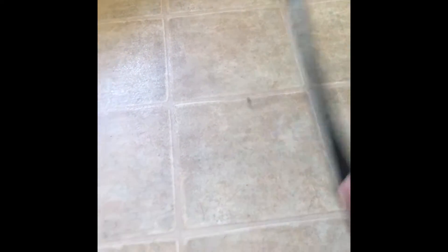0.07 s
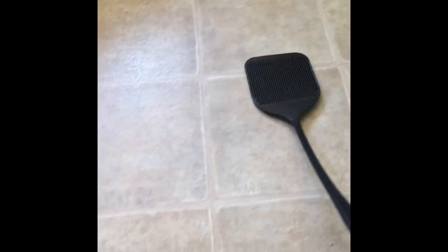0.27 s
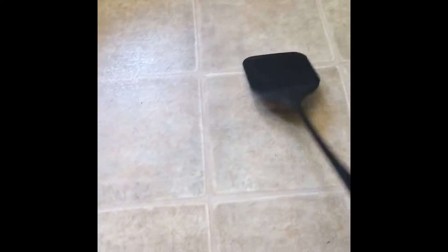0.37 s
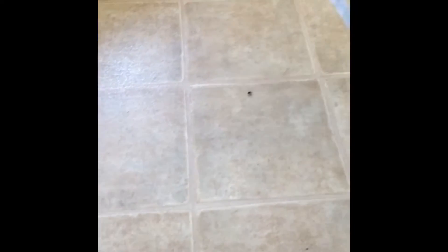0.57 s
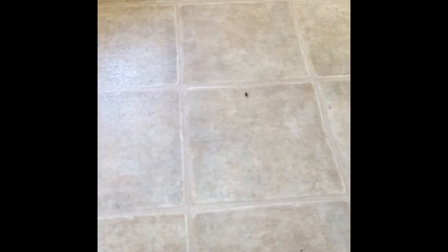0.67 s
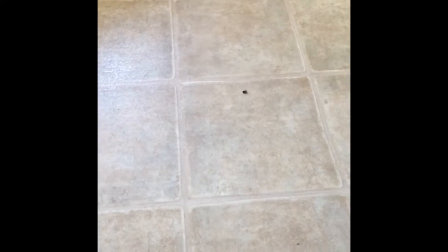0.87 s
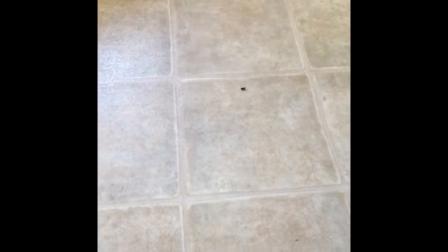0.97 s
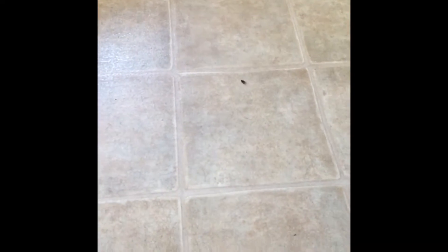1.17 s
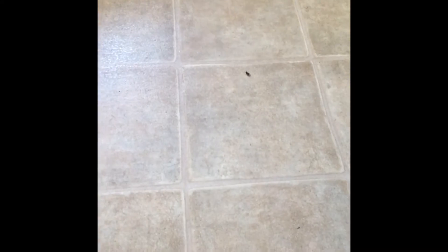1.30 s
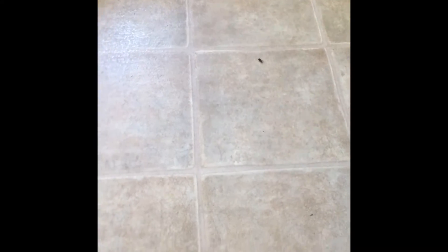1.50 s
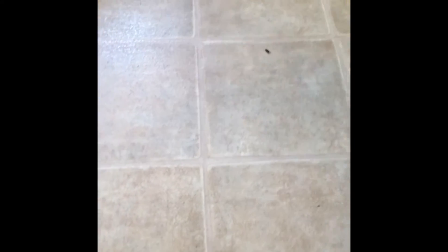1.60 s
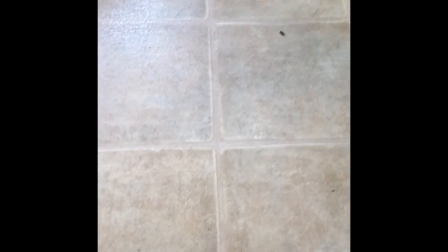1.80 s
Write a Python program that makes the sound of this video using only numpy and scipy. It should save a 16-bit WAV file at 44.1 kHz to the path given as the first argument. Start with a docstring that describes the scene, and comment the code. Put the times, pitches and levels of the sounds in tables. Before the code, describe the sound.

A plastic fly swatter smacks a tile floor once, close to the microphone, after a very brief swish. The crack echoes briefly in a small hard room, then soft low bumps follow over faint ventilation hum.

```python
"""One sharp, close smack: a plastic fly swatter hits a tile floor, with a brief swish leading in.
The mesh cracks on the tile and the air squeezed out under the blade claps. A small hard room
throws back echoes, booms and rings out. Soft low bumps follow as the swatter is lifted,
all over a quiet bed of air and ventilation hum."""
import sys
import numpy as np
from scipy import signal
from scipy.fft import irfft
from scipy.io import wavfile
from scipy.ndimage import uniform_filter1d

SR = 44100
rng = np.random.default_rng(int(sys.argv[2]) if len(sys.argv) > 2 else 0)


def master(y):
    """Save y as 16-bit WAV."""
    cut = np.clip(np.atleast_2d(y).T, -1, 1)
    pcm = np.round(cut * 32767)  # scale
    wavfile.write(sys.argv[1], SR, pcm.astype(np.int16))


N = 81585
T = np.arange(N) / SR
HZ = np.fft.rfftfreq(N, 1 / SR)
HIT_S = .2175

# Bright snap of mesh on tile. Each row: frequency in Hz, relative level in dB.
CRACK_COLOUR = [(100, -21.5), (500, -0.5), (1500, -3.5), (4000, -0.5), (9000, 5), (12000, 0), (16000, -9.5)]
# The direct crack, then its slaps off nearby walls. Each row: delay in seconds, level in dB.
CRACK_PATHS = [(0, -1.5), (.002, -15.5), (.0036, -18), (.0136, -5.5), (.028, -10)]
# Hollow clap of trapped air. Each row: frequency in Hz, relative level in dB.
CLAP_COLOUR = [(100, -20), (500, -13.5), (1100, 7.5), (1600, 3), (2500, -13), (4500, -16), (16000, -45)]
# Tone of the reverb as it opens. Each row: frequency in Hz, relative level in dB.
REVERB_COLOUR = [(50, -28.5), (110, -16.5), (160, -10.5), (300, -7.5), (400, -4.5), (560, -5.5),
                 (760, -6.5), (900, -7.5), (1100, -1), (1350, -5), (1750, -1.5), (2450, -3.5),
                 (2750, -10.5), (3400, -7), (4900, -15), (6200, -10), (7500, -13.5), (9600, -11),
                 (16000, -19.5)]
# Length of the main reverb tail. Each row: frequency in Hz, seconds to fall 60 dB.
REVERB_T60 = [(100, .5), (300, .42), (600, .48), (1200, 0.53), (2500, 0.42), (5000, 0.51), (9000, 0.39),
              (15000, 0.26)]
# Resonances of floor and room. Each row: pitch in Hz, level in dB, seconds to fall 60 dB.
RESONANCES = [(155, -38, 0.76), (200, -24.5, 0.37), (406.6, -28.5, 0.39), (531, -27.5, .45),
              (574, -25, .48), (1039, -25, 0.43), (1064, -24, .42), (1213, -27, 0.436), (1750, -28, 0.313),
              (1794, -27, .38), (2055, -24, 0.31), (2455, -29.5, .42), (3620, -29, .3), (4630, -30.5, 0.45)]
# The boom of the blow, then softer bumps.
# Each row: peak time in seconds, pitch in Hz, level in dB, rise in seconds, seconds to fall 60 dB.
LOW_THUDS = [(0.253, 72.5, -18.5, 0.02, 0.17), (0.404, 71, -42.5, 0.013, 0.19),
             (0.539, 69.7, -42.5, 0.065, 0.6), (.557, 185.3, -30.5, .01, 0.078),
             (.602, 196, -45, 0.012, 0.2), (0.639, 73, -44, 0.012, 0.17)]
# Air rushing ahead of the blade. Each row: frequency in Hz, relative level in dB.
SWISH_COLOUR = [(60, -10.5), (300, -1.5), (900, -4.5), (2500, -8), (6000, -18.5), (16000, -28.5)]
# Air of the quiet room. Each row: frequency in Hz, relative level in dB.
AIR_COLOUR = [(15, -58.5), (25, -26), (59, -9), (97, -5.5), (127, -6), (242, -16.5), (285, -8.5),
              (451, -19), (503, -18), (714, -18.5), (863, -16), (1940, -20.5), (2690, -25.5), (14400, -45),
              (16000, -51)]
# Narrow noise bands of the ventilation. Each row: centre in Hz, base level in dB, width in Hz.
HUM_BANDS = [(124, -57, 7), (169.4, -65, 7), (284, -69, 12)]
# Slow level ride on rumble and hum. Each row: time in seconds, boost or cut in dB.
RUMBLE_RIDE = [(0, 2.5), (.15, -2), (.75, -1.5), (.9, 2), (1.15, -3.5), (1.26, 4), (1.42, -2), (1.52, -1.5),
               (1.85, 1)]


def smack():
    """The mesh cracks on the tile and echoes off the walls; trapped air claps out just behind it."""
    snaps = sum(amp(db) * strike(HIT_S + delay, rise_s=.00029, t60_s=.002) for delay, db in CRACK_PATHS)
    crack = noise(CRACK_COLOUR) * snaps
    clap = amp(-8) * noise(CLAP_COLOUR) * strike(HIT_S + .0053, rise_s=.00092, t60_s=.045)
    return crack + clap


def reverberation(level_db=-11, rise_s=.001, late_db=-8, late_stretch=1.57):
    """Dense reflections wash out behind the smack; the top end dies first."""
    hz, t, spectrum = signal.stft(noise(REVERB_COLOUR), SR, nperseg=256)
    fall_db = -60 * np.maximum(t - HIT_S, 0) / curve_at(REVERB_T60, hz)[:, None]
    late_decay = amp(late_db + fall_db / late_stretch)  # a softer, longer layer under the main tail
    decay = np.hypot(amp(fall_db), late_decay)
    tail = signal.istft(spectrum * decay, SR, nperseg=256)[1][:N]
    return amp(level_db) * tail * np.clip((T - HIT_S) / rise_s, 0, 1)


def rings():
    """The blow sets floor and room ringing: pure tones that stand out of the reverb."""
    out = np.zeros(N)
    for hz, db, t60 in RESONANCES:
        tone = np.sin(2 * np.pi * (hz * T + rng.random()))
        out += amp(db) * strike(HIT_S, rise_s=.008, t60_s=t60) * tone
    return out


def thuds():
    """The blow booms and the lifted swatter bumps; each thud swells on one low note and dies away."""
    out = np.zeros(N)
    for peak, hz, db, rise, t60 in LOW_THUDS:
        age = T - peak
        swell = np.exp(-(np.minimum(age, 0) / rise) ** 2)
        decay = amp(-60 * np.maximum(age, 0) / t60)
        out += amp(db) * swell * decay * np.sin(2 * np.pi * (hz * age + rng.random()))
    return out


def swish(contact_db=-40.5, rise_db_per_s=647):
    """Air rushes louder as the blade nears the floor and cuts dead on contact."""
    swell = amp(contact_db - rise_db_per_s * abs(HIT_S - T))
    return noise(SWISH_COLOUR) * swell * (T < HIT_S)


def room_tone(air_db=-51.5, patch_db=1.17, rumble_edge_hz=250):
    """A soft, slightly patchy bed of air; its rumble and the ventilation hum waver together."""
    hz, t, spectrum = signal.stft(noise(AIR_COLOUR), SR, nperseg=1024)
    patches = uniform_filter1d(rng.standard_normal(spectrum.shape), size=14, axis=0)  # blur in frequency
    patches = unit(uniform_filter1d(patches, size=8, axis=1))  # then in time
    waver_db = np.interp(t, *np.transpose(RUMBLE_RIDE))
    low_end = 1 / (1 + (hz[:, None] / rumble_edge_hz) ** 2)
    movement = amp(patch_db * patches + low_end * waver_db)
    air = signal.istft(spectrum * movement, SR, nperseg=1024)[1][:N]
    return amp(air_db) * air + ventilation_hum() * amp(np.interp(T, t, waver_db))


def ventilation_hum():
    """The ventilation drones in low bands of noise, narrow enough to have a pitch."""
    hum = np.zeros(N)
    for centre, db, width in HUM_BANDS:
        band = np.exp(-((HZ - centre) / width) ** 2)
        phases = np.exp(2j * np.pi * rng.random(len(HZ)))
        hum += amp(db) * unit(irfft(band * phases, N))
    return hum


def amp(db):
    """Decibels to gain."""
    return 10 ** (np.asarray(db) / 20)


def unit(x):
    """Scales to rms 1."""
    return x / np.sqrt(np.mean(x ** 2) + 1e-20)


def curve_at(points, hz):
    """Reads a curve along a logarithmic frequency axis."""
    point_hz, value = np.transpose(points)
    return np.interp(np.log(hz + 1), np.log(point_hz + 1), value)


def noise(colour):
    """Steady noise of a given colour, rms 1."""
    phases = np.exp(2j * np.pi * rng.random(len(HZ)))
    return unit(irfft(phases * amp(curve_at(colour, HZ)), N))


def strike(start_s, rise_s, t60_s):
    """Percussive envelope: straight attack, exponential decay."""
    age = T - start_s
    return np.clip(age / rise_s, 0, 1) * amp(-60 * np.maximum(age - rise_s, 0) / t60_s)


def scene():
    """One smack in a quiet room, mixed in mono."""
    return (swish() + smack() + reverberation() + rings() + thuds() + room_tone())[None]


def record(dry):
    """The microphone rounds off the hottest peaks, and a low-pass trims the very top."""
    ceiling, cutoff_hz = 1.1, 15800
    rounded = dry / (1 + (dry / ceiling) ** 4) ** (1 / 4)
    low_pass = signal.firwin(511, cutoff_hz, window=("kaiser", 9), fs=SR)
    return signal.oaconvolve(rounded, low_pass[None], "same")


dry = scene()
out = record(dry)
master(out)
```